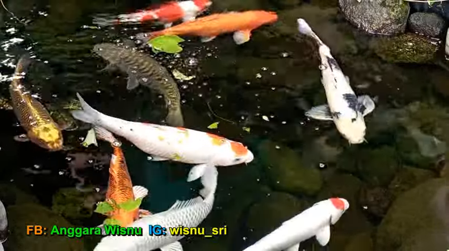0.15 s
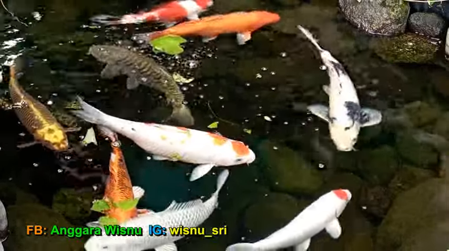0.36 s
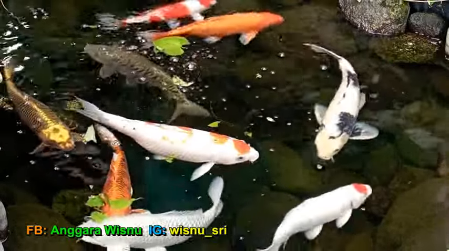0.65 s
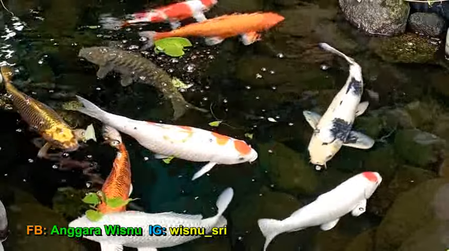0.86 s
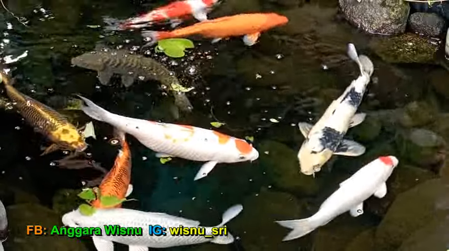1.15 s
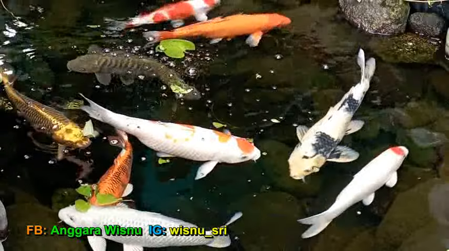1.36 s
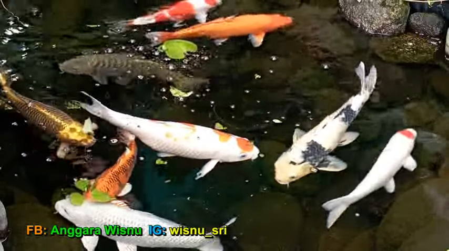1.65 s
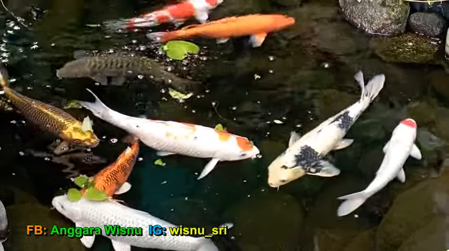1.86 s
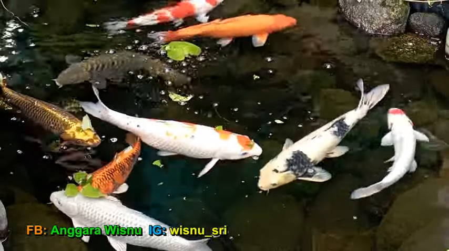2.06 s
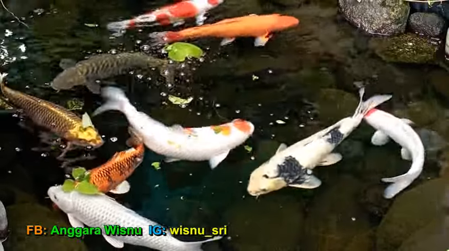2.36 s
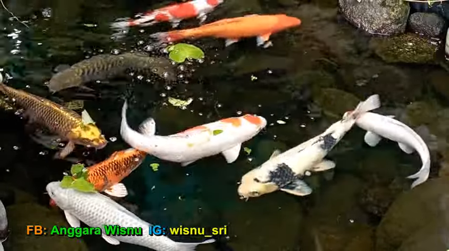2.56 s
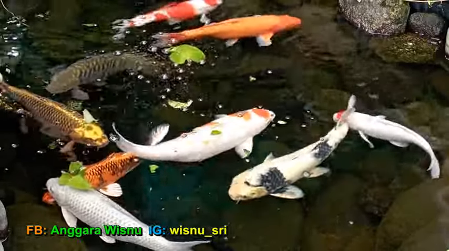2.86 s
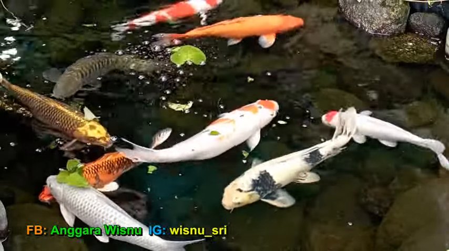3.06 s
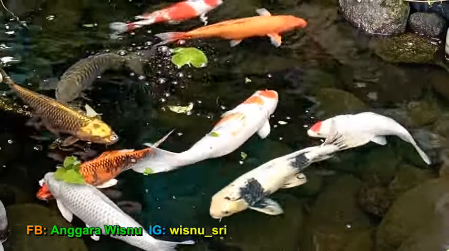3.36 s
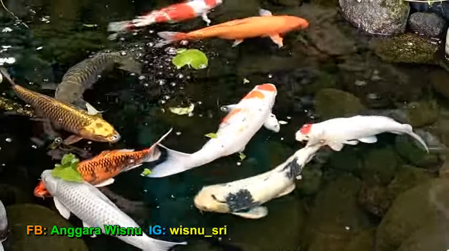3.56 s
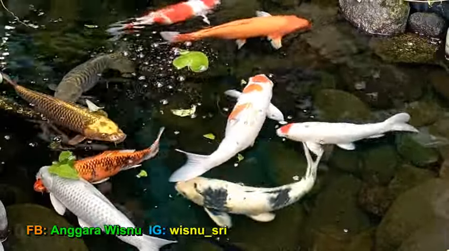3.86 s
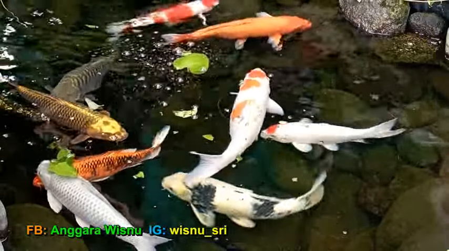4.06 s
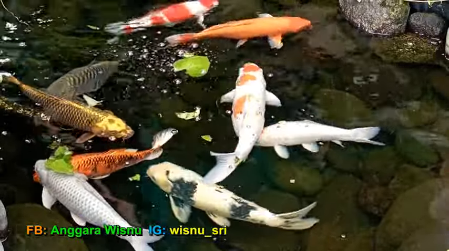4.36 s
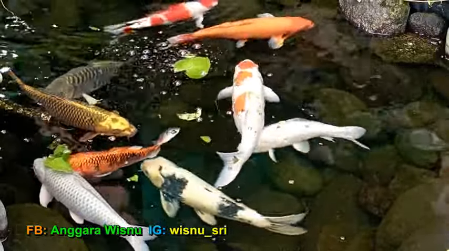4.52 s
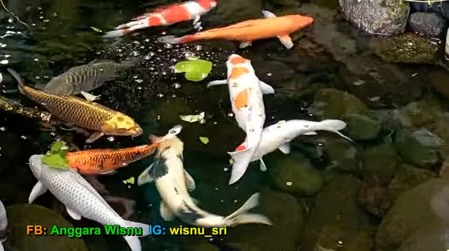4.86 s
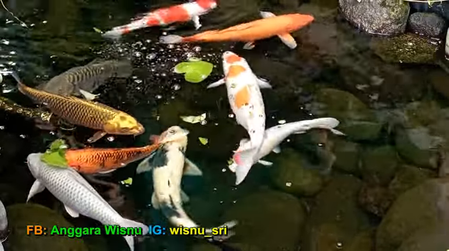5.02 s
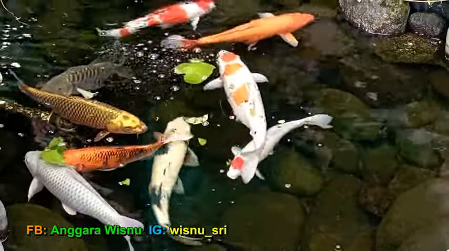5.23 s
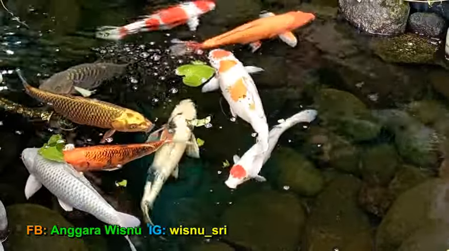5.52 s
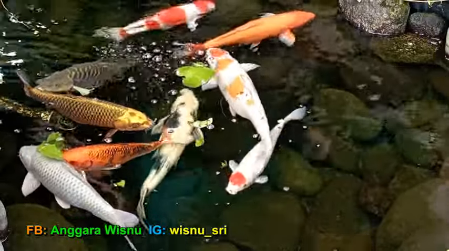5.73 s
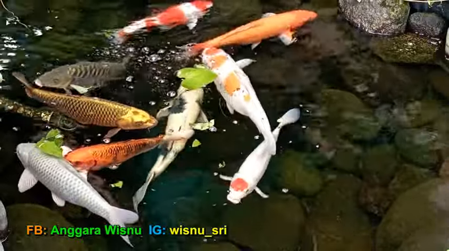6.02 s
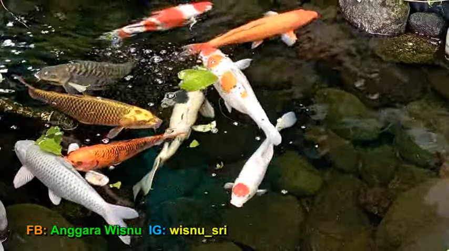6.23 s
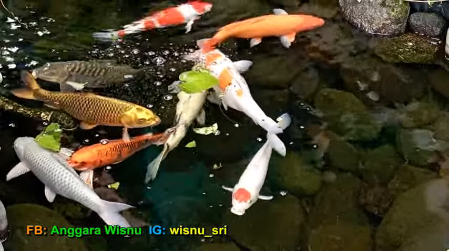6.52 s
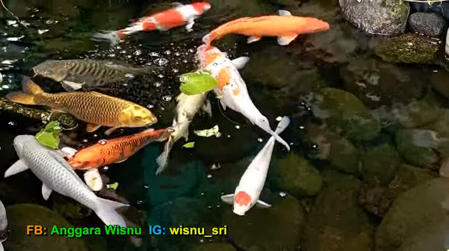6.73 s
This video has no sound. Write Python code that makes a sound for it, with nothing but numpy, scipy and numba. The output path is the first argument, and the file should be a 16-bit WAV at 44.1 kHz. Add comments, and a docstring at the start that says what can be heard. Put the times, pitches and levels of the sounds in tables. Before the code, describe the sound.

A steady thin stream of water falls into a stone-edged garden pond. Sharp high drips, short plinking bubbles and small low gurgles scatter irregularly over a soft fizzing patter. Faint chick-like peeps repeat on the right, a few dull soft knocks occur, and far behind lie a low idling engine and traffic rumble. Close stereo outdoor microphone, with a short diffuse reflection from the stones.

```python
"""Trickle into a garden pond

Water drops tick on the surface and trap bubbles, modelled as damped sines that swell, glide and die. Many
smaller splashes patter over flickering noise bands (fizz), and spray spits short bright bursts. Arched whistles
(a chick) peep off to the right; harmonics of a firing rate make a far idling engine. Single damped swings give
a few dull knocks, and low noise gives a rumble that swells and sinks. A two-port microphone hears level and
phase differences; stones round the pond add a scattered tail."""
import sys
import numpy as np
from scipy import signal
from scipy.fft import rfft, irfft
from scipy.io import wavfile
from scipy.ndimage import uniform_filter1d
from numba import njit

SR = 44100
rng = np.random.default_rng(int(sys.argv[2]) if len(sys.argv) > 2 else 0)


def int16_out(signal):
    """Quantize to a 16-bit WAV file."""
    q = np.round(np.clip(np.atleast_2d(signal).T, -1, 1) * 32767)
    wavfile.write(sys.argv[1], SR, q.astype(np.int16))


N = 303849

# level of the left port over the right for bubbles of each pitch: pitch_hz, left_minus_right_db
PORT_LEAN = [(500, -1), (1300, 3), (2000, 2), (3400, -1.5), (4300, -9), (5500, 4), (8000, 1.5)]


def undb(db):
    """Decibels are a logarithmic measure of amplitude: 20 dB is a factor of ten."""
    return 10 ** (np.asarray(db) / 20)


def curve(table, column):
    """Linear interpolation turns sparse settings into a continuous course in time."""
    rows = np.array(table)
    return np.interp(np.arange(N) / SR, rows[:, 0], rows[:, column])


def over_hz(table, hz):
    """Interpolation on a logarithmic frequency axis gives equal weight to equal intervals."""
    rows = np.array(table, float)
    return np.interp(np.log(hz + 1), np.log(rows[:, 0] + 1), rows[:, 1])


def walk(rate):
    """Random modulation: levels held 1 / rate s, smoothed by two moving averages; spread near 1."""
    k = int(SR / rate)
    held = np.repeat(rng.standard_normal(N // k + 1), k)
    slewed = uniform_filter1d(uniform_filter1d(held, k), k)
    return 1.79 * slewed[:N]


@njit
def ring(start, hz, gain, t60, glide, rise, hold):
    """Damped oscillation: gliding sines swell and die, ever faster if hold > 1; start and gain are per port."""
    out = np.zeros((2, N))
    for e in range(len(hz)):
        for c in range(2):
            i = int(start[e, c]) + 1
            f = hz[e]
            phase = 2 * np.pi * hz[e] * (i - start[e, c]) / SR
            swell, ease = 1., np.exp(-1 / (rise[e] * SR))
            age, step = 0., 1 / (t60[e] * SR)  # age 1 is 60 dB down
            while i < N and age < .9 and f < SR / 3:
                swell *= ease
                decay = 10 ** (-3 * age ** hold)
                out[c, max(i, 0)] += gain[e, c] * (1 - swell) ** 2 * decay * np.sin(phase)
                phase += 2 * np.pi * f / SR
                f *= 2 ** (glide[e] * hz[e] / SR)
                age += step
                i += 1
    return out


def bubbles(s, hz, db, t60_s, glide, pan_db, rise, scatter, hold=1.313):
    """Bubble resonance at scattered spots: rise in cycles, glide in octaves per cycle, scatter in samples."""
    lag = scatter * rng.standard_normal(len(s))
    left_start = s * SR - rise * SR / hz
    start = np.stack([left_start, left_start + lag], axis=1)
    gain = undb(np.stack([db + pan_db / 2, db - pan_db / 2], axis=1))
    return ring(start, hz, gain, np.maximum(t60_s, 1 / hz), glide.clip(-.012, .05), rise / hz, max(hold, 1.))


def ticks(s, db, pan_db):
    """Impact transient: a click of a few cycles at a chance pitch, cut off sharply."""
    hz = 6000 * 2 ** (0.5 * rng.standard_normal(len(s))).clip(-2, 1)
    return bubbles(s, hz, db, 5 / hz, 0 * s, pan_db, rise=0.966, scatter=0.11, hold=10.2)


def drops():
    """Entrained bubbles: a tick of impact, then a ring whose pitch climbs on average near the surface."""
    # the loud bubbles: start_s, pitch_hz, strength_db, ring_t60_ms
    loud_bubbles = [(0.0518, 4430, -13, 2.4), (0.0526, 1600, -23.5, 14), (.114, 2800, -27, 7.2),
                    (0.416, 2590, -29, 20), (0.416, 1710, -27, 29), (.497, 6430, -17.5, 4.8),
                    (0.577, 1800, -26, 21), (0.5614, 2120, -30, 8.9), (.6265, 1990, -23.5, 6),
                    (0.645, 3000, -27.5, 10.6), (0.6744, 5030, 3, 1.43), (0.677, 3300, -16.5, 4.5),
                    (.679, 6400, -26, 5.4), (0.837, 6710, -24.5, 14), (0.8755, 4840, -10.5, 2.7),
                    (.917, 2780, -11, 3.5), (.943, 2960, -21.5, 12.4), (1.053, 6560, -17.5, 2.7),
                    (1.0772, 1920, -23.5, 11), (1.0807, 5800, -8.5, 1.3), (1.135, 2460, -7, 2.3),
                    (1.205, 2020, -24.5, 14), (1.333, 2460, -27, 8.5), (1.377, 3710, -19.5, 6),
                    (1.428, 3570, -26, 11.4), (1.437, 2370, -27, 9.1), (1.5682, 3140, -28.5, 18),
                    (1.668, 6940, -15, 2.8), (1.6891, 2060, -15.5, 9.8), (1.7493, 2230, -31, 43),
                    (1.7574, 4550, -14.5, 3.8), (1.799, 2430, -7.5, 3), (1.825, 2000, -7, 1.9),
                    (2.092, 1940, -18.5, 5.4), (2.1343, 6630, -11.5, 2.96), (2.244, 2620, -6.5, 2.36),
                    (2.269, 1800, -20, 9.1), (2.2867, 3160, -25.5, 14), (2.3133, 5740, -16.5, 2.5),
                    (2.43, 6230, -22.5, 4.9), (2.454, 2740, -28, 10.5), (2.6067, 2800, -21.5, 7.2),
                    (2.608, 1680, -19.5, 12.4), (2.6456, 5700, -4.5, 1.12), (2.683, 2420, -28, 11),
                    (2.709, 6900, -6.5, 0.66), (2.7845, 6300, -0.5, 0.9), (2.7913, 2750, -17.5, 6.5),
                    (2.8332, 1730, -24, 8.7), (2.8382, 5500, -18.5, 6.3), (2.84, 7400, -14, 3.9),
                    (2.8552, 2200, -14.5, 4.1), (2.8844, 5540, -20.5, 4.5), (2.9297, 2640, -26, 10),
                    (2.9445, 6800, -9, 1.65), (2.9752, 1000, -22, 9.7), (3.0273, 8560, -5, 0.83),
                    (3.035, 3700, -6, 2.2), (3.0544, 2940, -14, 5.4), (3.077, 2280, -26, 7.8),
                    (3.1, 4060, -25, 10.6), (3.1046, 3120, -17, 3.8), (3.151, 3430, -25.5, 16.6),
                    (3.1579, 2120, -25, 18), (3.245, 1730, -31, 20), (3.313, 5760, -20.5, 6.3),
                    (3.3325, 5930, -7, 1.4), (3.45, 1780, -23, 27), (3.4492, 5320, -11.5, 2.5),
                    (3.5355, 1900, -13.5, 6.4), (3.726, 3470, -22, 4), (3.7718, 7740, -3.5, 0.84),
                    (3.916, 5555, -32, 6.7), (3.9336, 3100, -24.5, 13), (4.066, 6400, -18.5, 4.4),
                    (4.0938, 1860, -19.5, 11), (4.1042, 5900, -16, 3), (4.124, 5330, -0.5, 3.4),
                    (4.144, 4730, -1, 0.69), (4.191, 7100, -4, 0.81), (4.2593, 1660, -19.5, 6.6),
                    (4.2703, 2470, -29.5, 8.7), (4.277, 8300, -3, 0.82), (4.2907, 6740, -11, 1.24),
                    (4.4397, 4530, -13.5, 4.4), (4.493, 2650, -21.5, 7), (4.51, 5830, -21, 4),
                    (4.6119, 2405, -33, 22), (4.645, 4100, -16, 4.9), (4.68, 5630, -10, 0.9),
                    (4.6873, 3070, -25, 7.6), (4.691, 6430, -12, 3.2), (4.701, 5060, -10.5, 3),
                    (4.7115, 3010, -20, 13), (4.763, 3060, -15.5, 9.4), (4.803, 2750, -27.5, 11),
                    (4.823, 6800, -19, 2.9), (4.845, 5740, -14, 3.1), (4.8636, 3490, -3, 2.1),
                    (4.9257, 5140, -2.5, 0.64), (4.962, 5430, -22.5, 6.4), (5.0543, 5230, -20.5, 4),
                    (5.1225, 4220, -21, 12), (5.134, 3270, -1.5, 2.66), (5.141, 8500, -13, 2.33),
                    (5.208, 1870, -35, 10), (5.2387, 5360, -18, 2.7), (5.2583, 2640, -4.5, 3.6),
                    (5.281, 5000, -13, 2.3), (5.3618, 7710, -15, 2.5), (5.363, 1800, -18, 11.4),
                    (5.4316, 4060, -9.5, 2.3), (5.4591, 7800, -6.5, 2.6), (5.471, 7750, -7.5, 1.8),
                    (5.5282, 4960, -14.5, 5.2), (5.654, 3610, -22, 6.1), (5.675, 2426, -24.5, 5.8),
                    (5.7034, 4700, -10.5, 2.9), (5.704, 2950, -13.5, 5.3), (5.7589, 4770, -6, 2.2),
                    (5.83, 2910, -27.5, 36), (5.883, 2970, -25, 6.5), (5.883, 1735, -25, 21),
                    (5.902, 3700, -7, 4.3), (5.9451, 1470, -18, 12), (5.983, 3660, -27.5, 8.4),
                    (6.016, 1950, -23.5, 12), (6.1365, 3500, -15, 3.4), (6.1629, 3034, -24.5, 9.9),
                    (6.1633, 1590, -17, 6.2), (6.17, 4836, -10, 1.6), (6.214, 6500, -14, 2.7),
                    (6.2393, 8150, -14, 2.2), (6.309, 6000, -23.5, 6.3), (6.3283, 2660, -20.5, 6.8),
                    (6.347, 3440, -25.5, 9), (6.443, 3100, -21, 10), (6.449, 7610, -12.5, 3.4),
                    (6.52, 4940, -3, 1.55), (6.542, 3300, -3, 2.56), (6.5647, 2410, -12.5, 5.1),
                    (6.5648, 6960, -7, 1.4), (6.607, 5370, -8, 1.8), (6.633, 3410, -27, 19),
                    (6.6702, 2070, -28, 32), (6.756, 2930, -8.5, 2), (6.763, 1853, -20, 17.6),
                    (6.809, 3100, -29, 12)]
    s, hz, db, t60_ms = np.transpose(loud_bubbles)
    cycles, pan_db = t60_ms * hz / 1000, over_hz(PORT_LEAN, hz)
    # octaves over the ring time: big low bubbles climb further and scatter less
    mean_climb_oct = 0.079 * (3000 / hz) ** 0.63
    climb_scatter_oct = 0.2 * np.minimum(hz / 3000, 1) * rng.standard_normal(len(s))
    climb_oct = mean_climb_oct + climb_scatter_oct
    # long rings swell more slowly
    rise = 0.62 + 0.042 * cycles + hz / 7000
    rings = bubbles(s, hz, db, t60_ms / 1000, climb_oct / cycles, pan_db, rise=rise, scatter=0.17)
    # the tick weakens for bubbles below 2500 Hz
    tick_db = db - 17 - 6 * np.maximum(np.log2(2500 / hz), 0)
    return rings + ticks(s, tick_db, pan_db)


def spits():
    """Broadband transients of spray without trapped bubbles: a sharp high burst over a lower click."""
    # bright spits: start_s, level_db
    spray_spits = [(0.4958, -33), (0.6023, -29), (0.718, -33.5), (0.8742, -23), (1.02, -33), (1.1875, -31),
                   (1.532, -40), (1.8184, -34), (1.882, -28), (2.307, -30), (2.374, -29), (2.6115, -35),
                   (2.6415, -29), (2.7836, -32), (2.946, -24.5), (3.0275, -33), (3.3325, -30),
                   (3.4491, -30.5), (3.7209, -28), (3.7712, -27.5), (3.9162, -26.5), (4.093, -32),
                   (4.1237, -46), (4.2773, -28), (4.4058, -33.5), (4.475, -36), (4.711, -27),
                   (4.762, -25.5), (5.0747, -27.5), (5.1332, -30), (5.174, -39), (5.192, -37),
                   (5.3381, -30), (5.4021, -32), (5.701, -28.5), (5.9024, -29), (5.984, -28), (6.1357, -33),
                   (6.2039, -31), (6.328, -38), (6.4598, -31), (6.541, -29.5), (6.612, -31), (6.651, -31),
                   (6.8335, -35)]
    s, db = np.transpose(spray_spits)
    # each lies a little off the common pitch
    off_oct = (np.array([.1, .25]) * rng.standard_normal((len(s), 2))).clip(-.4, .25)
    top_ratio, body_ratio = 2 ** off_oct.T
    hz, body_hz = 11500 * top_ratio, 6900 * body_ratio
    top = bubbles(s, hz, db, 19.5 / hz, 0 * s, 0 * s, rise=2.42, scatter=0.13, hold=3.4)
    body = bubbles(s, body_hz, db + 12, 5.2 / body_hz, 0 * s, 0 * s, rise=1.3, scatter=0.099, hold=2.56)
    return top + body


def patter(flow_db, count=1700, size=4):
    """Random superposition of small splashes: each a tick and a few bubbles of different sizes after it."""
    # relative loudness of small bubbles: pitch_hz, level_db
    loudness_by_pitch = [(500, -20.5), (800, 0), (1300, 8.5), (2200, 12), (3200, 12), (4300, 15),
                         (6000, 21.5), (8500, 10.5), (12000, -12)]
    at, strength = rng.random((count, 2)).T
    s = at * N / SR
    splash_db = flow_db[(at * (N - 1)).astype(int)] - 2.92 * np.log(1 - 0.928 * strength)
    after, pitch, spread, cycles, glide, pan = rng.random((count * size, 6)).T
    hz = 520 * (13000 / 520) ** pitch
    db = np.repeat(splash_db, size) + over_hz(loudness_by_pitch, hz) - 12 * spread - 0.5
    # big low bubbles close off later; the smallest ring for fewer cycles
    delay_s = .004 * after ** 2 * (3000 / hz) ** 0.716
    t60_s = (10 + 60 * cycles ** 2 * np.minimum(1500 / hz, 1) ** 0.2) / hz
    rings = bubbles(np.repeat(s, size) + delay_s, hz, db, t60_s,
                    0.0447 * (glide - .38), 4 * (pan - .5), rise=2.312, scatter=2.44)
    return rings + ticks(s, splash_db - 2.0, 6 * (pan[:count] - .5))


def crackle(flow_db, count=3000):
    """Random impacts of falling spray: lone ticks, a low and a high part at once, most of them faint."""
    at, strength, pan, pitch = rng.random((count, 4)).T
    s, pan_db = at * N / SR, 5 * (pan - .5)
    db = flow_db[(at * (N - 1)).astype(int)] + 8.0 - 4.66 * np.log(1 - .97 * strength)
    low_hz = 2600 * 2 ** (1.2 * pitch)
    low = bubbles(s, low_hz, db - 0.5, 6 / low_hz, 0 * s, pan_db, rise=1.38, scatter=0.92, hold=1.73)
    high = bubbles(s, 2.2 * low_hz, db, 8 / (2.84 * low_hz), 0 * s, pan_db, rise=1.46, scatter=0.18, hold=1.84)
    return low + high


def gurgle(flow_db, count=220):
    """Low resonance of larger bubbles under the stream, most rising in pitch as they near the surface."""
    # the loud ones: start_s, pitch_hz, strength_db, ring_t60_ms, climb_oct_per_s (bubbles() limits it)
    loud_gurgles = [(0.071, 1130, -35, 40, -1), (0.16, 1470, -32, 15, 3), (0.16, 1220, -34, 17, -4),
                    (0.251, 977, -26, 22, 8), (0.261, 677, -35.5, 62, -3), (0.331, 1130, -34, 49, 26),
                    (0.372, 796, -28, 39, 0), (0.395, 595, -31, 35, 13), (0.4, 1250, -29, 22, 12),
                    (0.58, 1150, -28, 21, 7), (0.607, 1230, -32, 21, -2), (0.828, 1450, -36, 30, 0),
                    (0.888, 960, -34.5, 86, 8), (0.924, 720, -28, 20, -5), (0.934, 513, -34.5, 130, -0.5),
                    (1.01, 890, -38, 66, 3), (1.079, 1490, -32, 24, -2), (1.091, 1060, -37.5, 100, 1),
                    (1.134, 647, -36.5, 59, 23), (1.135, 1033, -34, 98, 22.5), (1.159, 829, -37, 42, 19),
                    (1.235, 1170, -40, 100, 5), (1.263, 1010, -33, 23, 4), (1.465, 770, -40, 72, -1),
                    (1.533, 1140, -27, 22, 27), (1.732, 1300, -30, 15.3, -12), (1.743, 895, -36, 24, 8),
                    (1.78, 494, -41, 100, -3), (1.859, 851, -35, 140, 9), (2.01, 1160, -26, 14, 7),
                    (2.098, 1350, -36, 30, 1), (2.145, 980, -37, 28, 10), (2.16, 1280, -33, 15, 7),
                    (2.216, 1530, -36, 24, -10), (2.234, 704, -25, 26, 23), (2.289, 850, -35, 27, -6),
                    (2.418, 871, -39, 44, 11), (2.659, 960, -42, 57, 10), (2.688, 636, -37, 50, 1),
                    (2.73, 541, -39, 67, 14.5), (2.77, 744, -32, 34, 2), (2.784, 754, -36, 83, 13.5),
                    (2.791, 1220, -31, 39, -2), (2.83, 730, -37, 80, 7), (3.012, 760, -28.5, 90, 6),
                    (3.016, 1530, -36, 21, 4), (3.096, 1540, -38, 42, -10), (3.114, 730, -32.5, 78, 14.5),
                    (3.146, 1200, -34, 60, 5), (3.189, 1020, -25, 26, 25), (3.322, 1100, -33, 16.5, -5),
                    (3.386, 1026, -31.5, 42, 11), (3.606, 1286, -29, 15.5, 7), (3.739, 1390, -27, 17, -10),
                    (3.842, 1170, -36, 36, 15), (3.901, 1050, -25, 15, 18), (4.095, 1040, -30, 27, 12),
                    (4.114, 1350, -39, 74, -5), (4.133, 890, -41, 43, 18), (4.204, 744, -38, 56, -2.5),
                    (4.34, 1120, -30, 30, -2), (4.501, 1130, -32, 58, -10.5), (4.535, 1060, -36, 26, 5),
                    (4.667, 1020, -39, 27, 3), (4.717, 970, -34, 27, -9), (4.749, 1150, -31, 36, 25),
                    (4.816, 875, -40, 37, 1), (4.882, 450, -47, 180, 13), (4.929, 1440, -38, 24, 8),
                    (4.934, 653, -28, 46, 4), (4.98, 1060, -37, 30, 17), (5.087, 1040, -35, 21, -21),
                    (5.092, 1530, -35, 24, 12), (5.117, 1453, -32, 37, 2), (5.144, 932, -27, 41, 27),
                    (5.194, 1210, -35, 26, 8), (5.221, 820, -25, 34, 0), (5.315, 1000, -29, 16.7, 6),
                    (5.397, 850, -30, 30, -4), (5.399, 1532, -42, 57, -2), (5.566, 1060, -31, 19.4, -4),
                    (5.6, 940, -28.5, 21, -4), (5.656, 676, -26, 32, -2), (5.694, 980, -32, 62, 16),
                    (5.747, 1206, -37, 57, 18), (5.842, 890, -23.5, 34, -7), (5.862, 868, -33, 57, -2.5),
                    (6.384, 1220, -28, 27, 15), (6.29, 695, -18, 37, -1), (6.405, 666, -35, 61, 23),
                    (6.478, 1357, -41, 30, 23), (6.646, 1256, -28.5, 24, 9)]
    s, hz, db, t60_ms, climb = np.transpose(loud_gurgles)
    loud = bubbles(s, hz, db, t60_ms / 1000, climb / hz, over_hz(PORT_LEAN, hz), rise=1.72, scatter=1.0, hold=1.22)
    # fainter ones at chance moments
    at, strength, pan, pitch, cycles, glide = rng.random((count, 6)).T
    hz = 800 * 2 ** (1.1 * pitch ** 0.8)
    db = flow_db[(at * (N - 1)).astype(int)] + 1.0 - 1.0 * np.log(1 - .97 * strength)
    faint = bubbles(at * N / SR, hz, db, (14 + 30 * cycles) / hz, 0.044 * (glide - .2), 3 * (pan - .5),
                    rise=2.45, scatter=1.9)
    return loud + faint


def ahead():
    """Zero path difference: two low drips straight ahead reach both ports in step."""
    # drips: start_s, pitch_hz, strength_db, ring_t60_ms, climb_oct_per_s
    drips = [(0.646, 930, -42, 44, 2), (2.807, 1254, -37.5, 59, 7)]
    s, hz, db, t60_ms, climb = np.transpose(drips)
    return bubbles(s, hz, db, t60_ms / 1000, climb / hz, 0 * s, rise=1.4, scatter=0)


def bands(table, flicker_db, rate):
    """Partly coherent noise at two ports, in half-octave bands that flicker independently; rms 1."""
    # likeness of the noise at the two ports: frequency_hz, likeness (0-1)
    likeness = [(60, 0.86), (400, 0.78), (900, 0.44), (2000, 0.13), (2900, 1), (4200, 0), (5500, 0.1),
                (9000, 1), (10600, 0.13), (12300, 1)]
    hz, out = np.arange(N // 2 + 1) * SR / N, 0
    alike = over_hz(likeness, hz).clip(0, 1)
    left, other = (rfft(rng.standard_normal(N)) * undb(over_hz(table, hz)) for _ in range(2))
    pair = np.array([left, alike * left + np.sqrt(1 - alike ** 2) * other])
    for centre_hz in 30 * 2 ** np.arange(0, 9.5, .5):
        window = np.cos(np.pi * np.clip(np.log2((hz + 1) / centre_hz), -.5, .5)) ** 2
        # tanh limits the flicker to twice flicker_db
        flicker = undb(flicker_db * np.tanh(walk(rate) / 2) * 2)
        out = out + irfft(pair * window, N) * flicker
    return out / np.sqrt(np.mean(out ** 2))


def fizz(flow_db):
    """Shaped noise: the fine fizz of the water, its level following the flow with a fast flutter."""
    # relative spectrum density: frequency_hz, level_db (per Hz)
    fizz_spectrum = [(400, -16), (700, -3), (1000, -10.5), (1500, -4.5), (2100, 0), (4200, -7), (6000, -11),
                     (8000, -4.5), (10500, -9), (12500, -12), (14500, -38)]
    return undb(flow_db - 1.5 + 2.62 * walk(45)) * bands(fizz_spectrum, flicker_db=4.0, rate=45)


def chick(pan_db=-8.):
    """Frequency-modulated whistle: a short rise to the crest, a longer fading fall; louder at the right."""
    # peeps: crest_s, crest_hz, crest_level_db (before flutter and pan), fall_ms, end_hz, linger (power)
    peeps = [(1.385, 3450, -49, 52, 2450, 1.6), (1.481, 4270, -43, 40, 3400, 3.2),
             (1.672, 4100, -50, 85, 2900, 1.6), (1.750, 3600, -52, 40, 2600, 1.3),
             (2.092, 3400, -46, 45, 2500, 1.6), (2.423, 3450, -45, 40, 2600, 2),
             (2.783, 3500, -41, 30, 2600, 2.2), (3.163, 3500, -43, 24, 3000, 2.2),
             (3.423, 3450, -48, 35, 2750, 2.2), (3.752, 3500, -47, 40, 2700, 2.2),
             (4.118, 3400, -50, 25, 2900, 2.2), (4.480, 3500, -47, 35, 2750, 2.2),
             (4.858, 3450, -48, 30, 2800, 2.2), (5.185, 3450, -49, 35, 2750, 2.2),
             (5.582, 3400, -48, 55, 2150, 1.6), (5.940, 3400, -52, 50, 2500, 2.2),
             (6.745, 3500, -50, 45, 2550, 2.2)]
    rise_share, climb_share = .55, .42  # rise time over fall time, pitch climb over pitch drop
    out = np.zeros(N)
    for s, hz, db, fall_ms, end_hz, linger in peeps:
        rise_ms, sag = rise_share * fall_ms, 1 - end_hz / hz
        i = np.arange(int((s - rise_ms / 1000) * SR), int((s + fall_ms / 1000) * SR))
        t_ms = (i / SR - s) * 1000
        before, after = np.maximum(-t_ms / rise_ms, 0), np.maximum(t_ms / fall_ms, 0)
        climb = climb_share * sag * before ** 1.9
        fall = sag * np.sin(np.pi / 2 * after) ** linger
        pitch_hz = hz * (1 - climb - fall)
        shape = (1 - before ** 2) * (1 - after ** 4) * undb(-9 * after)
        out[i] += undb(db) * shape * np.sin(2 * np.pi * np.cumsum(pitch_hz) / SR)
    # the level flutters, the same at both ports
    return out * undb(4 * walk(150) + np.array([[pan_db], [-pan_db]]) / 2)


def knocks():
    """Impact and resonance: one dull swing, lower the longer the contact, then a brief hollow ring."""
    # blows: centre_s, level_db (of the envelope, before ring and pan), contact_ms
    blows = [(.806, -31, 1.18), (0.823, -38, 4.6), (0.8436, -38.5, 1.2), (2.725, -34, 1.4),
             (2.731, -34.5, 0.98), (2.7722, -37.5, 1.15), (2.814, -39, 1.25), (2.845, -36.5, 1),
             (2.8486, -37, 0.9), (2.854, -39, 1.4), (2.869, -37, 1.26), (2.89, -34.5, 1.6),
             (2.911, -41, 1.1), (2.924, -36.5, 5.43), (4.844, -31, 1.17), (4.847, -42, 2.8),
             (6.438, -41.5, 6.8)]
    hollow_hz, hollow_t60_s, hollow_db = 551, 0.044, -11
    out = np.zeros(N)
    for (s, db, contact_ms), turn in zip(blows, rng.random(len(blows))):
        i = np.arange(int((s - .03) * SR), int((s + .03) * SR))
        t = (i / SR - s) * 1000 / contact_ms
        # 0.52 turns per contact time, each blow pushed its own way
        swing = np.cos(2 * np.pi * (0.52 * t + turn / 2))
        out[i] += undb(db) * np.exp(-t ** 2) * swing
    t = np.arange(SR // 10) / SR
    hollow = 10 ** (-3 * t / hollow_t60_s) * np.cos(2 * np.pi * hollow_hz * t) * 2 * hollow_hz / SR
    out = out + undb(hollow_db) * signal.fftconvolve(out, hollow)[:N]
    return out * undb(np.array([[.7], [-.7]]))


def engine():
    """Harmonic series: sines at multiples of the firing rate, each wavering in level."""
    # course of the idle: time_s, firing_rate_hz, low_db, middle_db, upper_db (bases for the order offsets)
    idle = [(0.0, 23.26, -65, -59.5, -63), (0.57, 23.33, -73, -56.5, -56), (0.98, 24.94, -62, -60, -57.5),
            (1.5, 23.6, -64, -62, -60.5), (1.8, 24.42, -59, -59, -58), (1.96, 24.16, -68, -61, -63),
            (2.35, 24.22, -61, -73, -60.5), (2.68, 23.34, -72, -61, -59), (2.85, 24.28, -61, -62, -57.5),
            (3.2, 24.4, -68, -55, -60.5), (3.4, 24.97, -61, -62, -70.5), (5.01, 24.4, -68, -63.5, -68.5),
            (6.89, 22.76, -67, -65, -67)]
    # orders in each group: multiple (of the firing rate), offset_db
    low_orders = [(2, 2.5)]
    middle_orders = [(3, 1), (4, -9)]
    upper_orders = [(6, -1), (7, -2.5), (9, -8.5)]
    rate_hz = curve(idle, 1) * (1 + 0.002 * walk(5.93))
    phase = 2 * np.pi * np.cumsum(rate_hz) / SR
    out = 0
    for orders, column in ((low_orders, 2), (middle_orders, 3), (upper_orders, 4)):
        for k, db in orders:
            level = undb(db + curve(idle, column) + 0.97 * walk(5.77))
            out = out + level * np.sin(k * phase + 2 * np.pi * rng.random())
    return np.sqrt(2) * out  # the levels are rms


def rumble():
    """Low-frequency shaped noise: a low rumble that swells and sinks."""
    # relative spectrum density: frequency_hz, level_db (per Hz)
    rumble_spectrum = [(25, -12), (45, 2), (80, 2.5), (150, -4), (300, -8.5), (500, -14), (900, -35.5)]
    # swell of the rumble: time_s, level_db
    rumble_swell = [(0.0, -54), (0.46, -51), (2.28, -57), (2.94, -50.5), (3.32, -56), (5.05, -56.5),
                    (5.24, -56), (6.89, -57)]
    return undb(curve(rumble_swell, 1)) * bands(rumble_spectrum, flicker_db=3.5, rate=12)


def banks(x, t60_s, wet_db, shared_hz=1690.0):
    """Diffuse reflection: stones return a short scattered tail; only its treble differs between ports."""
    t = np.arange(int(.12 * SR)) / SR
    shared, left, right = rng.standard_normal((3, len(t)))
    low, high = (signal.butter(2, shared_hz, kind, fs=SR, output="sos") for kind in ("low", "high"))
    noise = signal.sosfilt(low, shared) + signal.sosfilt(high, np.array([left, right]))
    tail = noise * 10 ** (-3 * t / t60_s) * (1 - np.exp(-t / 0.000087))
    tail = tail / np.sqrt(np.sum(tail ** 2, axis=1, keepdims=True))
    return x + undb(wet_db) * signal.fftconvolve(x, tail, axes=1)[:, :N]


def ports(x):
    """Interaural-style phase delay: the sound reaches the right port with a trailing phase."""
    # lag of the right port behind the left: frequency_hz, phase_rad
    trailing_phase = [(0, 0), (300, .5), (550, 1.5), (680, 2.45), (900, 3.1), (1700, 3.2), (2300, 5.8),
                      (3300, 6.5), (4400, 9.8), (5700, 12.3), (6400, 12.6), (7200, 14.3), (9000, 15.7),
                      (10500, 17.1), (11800, 18.8), (13500, 19.1), (14300, 22)]
    rows = np.array(trailing_phase)
    trail = np.interp(np.arange(N // 2 + 1) * SR / N, rows[:, 0], rows[:, 1])
    return np.array([x[0], irfft(rfft(x[1]) * np.exp(-1j * trail), N)])


def scene():
    """Linear superposition of water, chick, knocks, engine and rumble at the two ports."""
    # strength of the trickle, from which water layers take their levels: time_s, level_db
    trickle_flow = [(0.0, -52), (0.96, -49.5), (1.02, -50.5), (1.69, -48.5), (1.92, -52), (2.97, -45),
                    (3.49, -51.5), (4.11, -51.5), (4.76, -48.5), (5.1, -49), (5.28, -48.5), (6.68, -49.5),
                    (6.89, -54)]
    flow_db = curve(trickle_flow, 1)
    water = banks(drops() + spits(), t60_s=0.04, wet_db=-9)
    # the finer spray lands further off, with more of the stones' tail
    water = water + banks(patter(flow_db) + crackle(flow_db), t60_s=0.065, wet_db=-5.5)
    water = water + banks(gurgle(flow_db), t60_s=0.19, wet_db=-5.5)
    bird = banks(chick(), t60_s=.04, wet_db=-8)
    trailing = ports(water + fizz(flow_db) + rumble() + engine())
    return trailing + bird + knocks() + ahead()


def record(dry):
    """Band limiting: a steep elliptic low-pass cuts the top above 15.2 kHz."""
    return signal.sosfilt(signal.ellip(12, .2, 80, 15200, fs=SR, output="sos"), dry)


dry = scene()
out = record(dry)
int16_out(out)
```